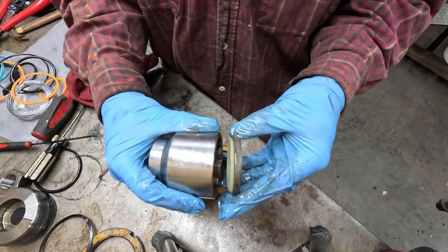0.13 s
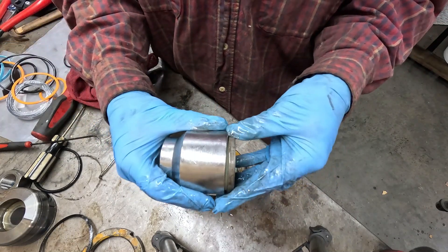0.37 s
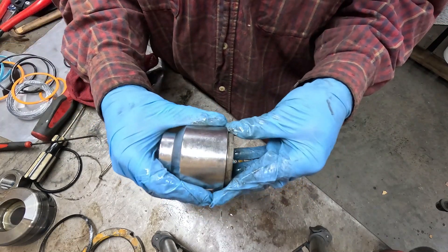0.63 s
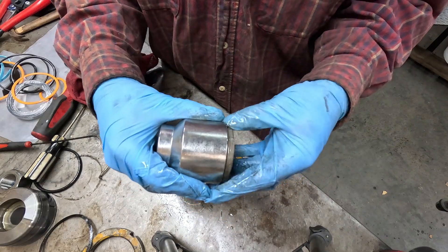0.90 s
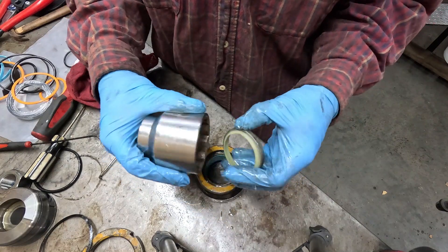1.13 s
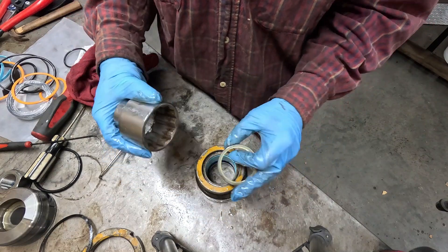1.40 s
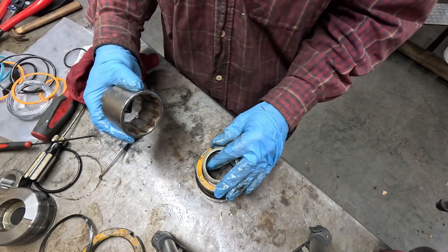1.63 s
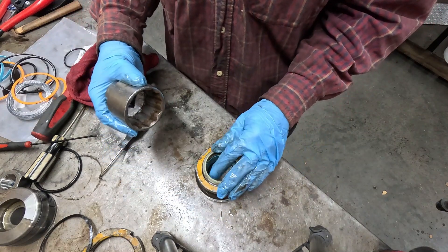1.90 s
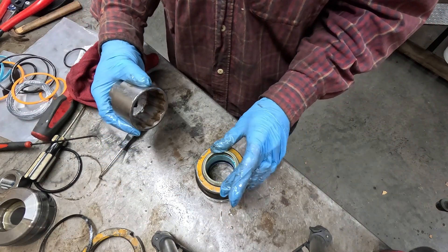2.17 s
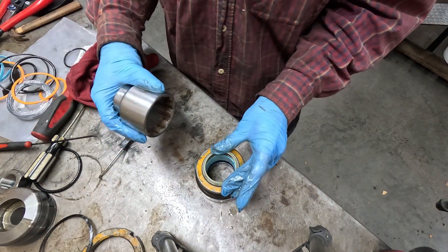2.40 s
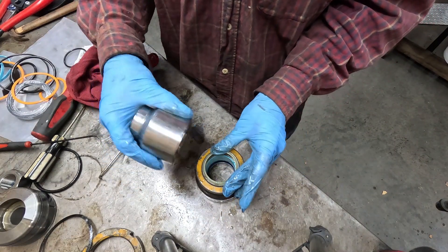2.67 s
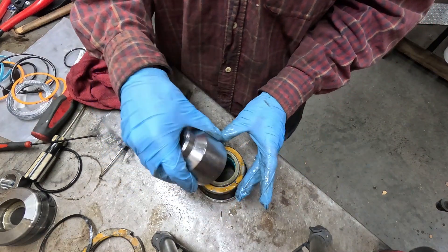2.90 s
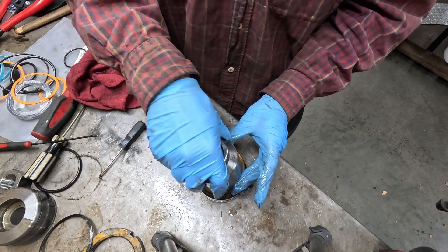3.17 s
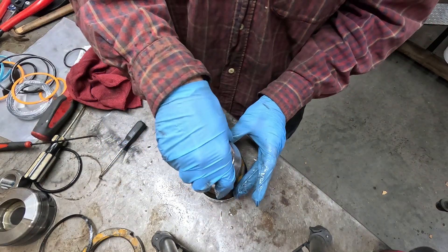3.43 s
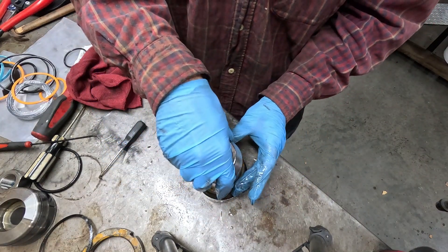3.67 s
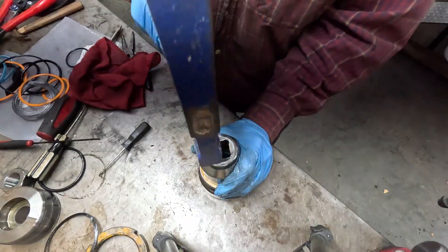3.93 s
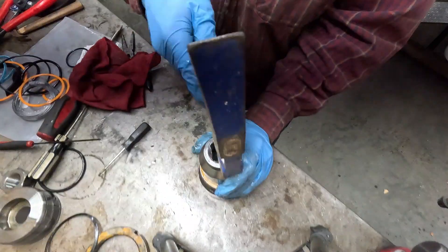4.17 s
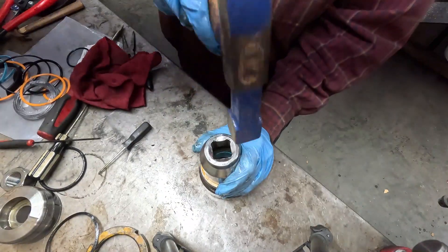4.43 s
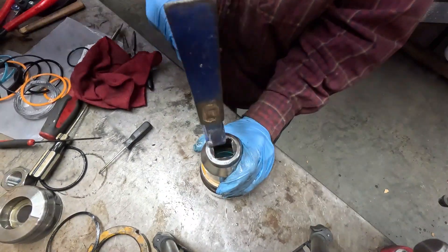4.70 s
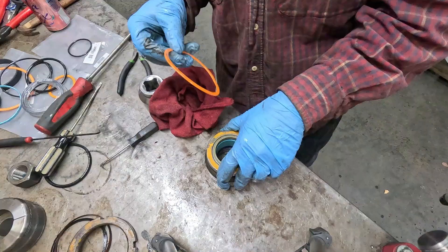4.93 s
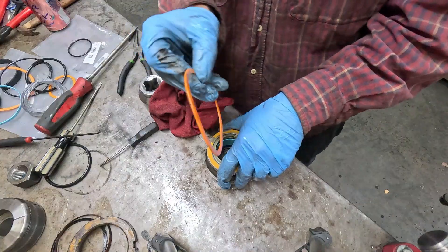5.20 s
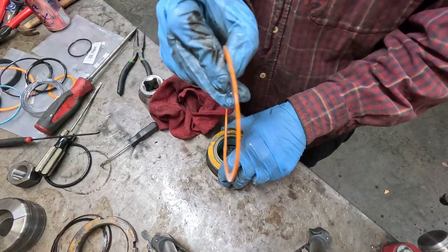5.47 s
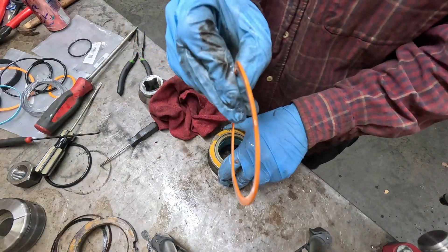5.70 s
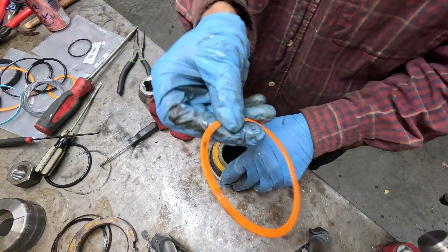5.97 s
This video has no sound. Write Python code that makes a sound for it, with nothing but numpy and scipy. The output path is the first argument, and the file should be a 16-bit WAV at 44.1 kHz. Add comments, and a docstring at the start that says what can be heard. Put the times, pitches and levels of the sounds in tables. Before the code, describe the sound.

In a reverberant workshop, heard close and wide, low rumble and light hiss lie under gloves rubbing and sleeves rustling. A scrape and a bright steel tick come near 0.5 s, with small scrapes and a tick around 0.9 to 1.0 s. From 1.55 to 2.1 s there is a busy cluster: a ringing clink at 1.6 s, scrapes, and dull low knocks as a seal is pressed home. Rubbing swells around 2.6 to 2.9 s, then fades, with a crisp tick at 3.53 s. At 3.77 s the sound becomes centred with a hard hammer blow on the socket, repeated at 4.2 and 4.68 s: short bright metallic ring, deep bench boom, diffuse hall tail. A tiny gap at 4.97 s cuts the tail. Then it is quiet: a faint tone near 5.1 s, a soft knock at 5.53 s, and a brief brushing scrape around 5.85 s before the end at about 6 s.

```python
"""At a workshop bench, gloved hands rub and touch a steel socket, a seal and its housing, spread wide over a low rumble.
Rubbing is flickering noise; ticks and scrapes are short noise puffs; taps and knocks set decaying sine tones ringing.
At 3.77 s a hammer drives the socket, twice more by 4.7 s: steel rings, bench booms, hall answers, all near the centre.
This part is quieter in the background and opens 5 ms into the first impact.
After a gap of some 20 ms at 4.97 s, the last part brings a brief faint tone, a knock and quiet handling."""
import sys
import numpy as np
from scipy import signal
from scipy.io import wavfile

SR = 44100
rng = np.random.default_rng(int(sys.argv[2]) if len(sys.argv) > 2 else 0)


def natural_amplitude(level_db):
    """Convert a level in decibels to a linear amplitude factor, elementwise."""
    exponent = np.asarray(level_db, float) / 20
    return 10 ** exponent


def int16_out(signal):
    """Quantize to a 16-bit WAV file."""
    q = np.round(np.clip(np.atleast_2d(signal).T, -1, 1) * 32767)
    wavfile.write(sys.argv[1], SR, q.astype(np.int16))


N = 268304   # length in samples, about 6.1 s
EDGES = 20 * 2 ** np.arange(0, 9.8, 1 / 3)   # third-octave band edges, Hz

# the tones of the struck steel: pitch_hz [Hz]
STEEL_HZ = [1120, 1700, 2440, 2870, 3040, 3160, 3330, 4620, 5470, 5680, 8650, 9950, 11620]
# how each tone dies and how loud each blow makes it, as each lands elsewhere on the rim:
# t60_s [s, time to fall 60 dB], blow1_db, blow2_db, blow3_db [dB]
STEEL_MODES = [(0.06, -21, -20.5, -21.5), (0.0073, -26.5, 0, -26.5), (0.013, -15, -16.5, -13.5),
               (0.069, -40.5, -15.5, -17.5), (.05, -44, -20, -12), (0.18, -76, -24, -15),
               (0.12, -39.5, -20.5, -11), (0.023, -34, -20.5, -18), (0.066, -22, -20.5, -18),
               (0.15, -26, -21.5, -22), (0.013, -32, -45.5, -50.5), (0.024, -27.5, -29.5, -43.5),
               (0.024, -17.5, -31.5, -48)]


def rms_one(x):
    """Scales a sound to unit power."""
    return x / np.sqrt(np.mean(x ** 2) + 1e-20)


def in_time(rows):
    """Joins (start_s, value) rows by straight lines."""
    return np.interp(np.arange(N) / SR, *np.transpose(rows))


def at_hz(points, hz):
    """Reads a spectrum between its points, on a log-frequency axis."""
    points_hz, values = np.transpose(points)
    return np.interp(np.log(hz), np.log(points_hz), values)


def drift(rate_hz):
    """A slow random curve of spread 1: noise smoothed at one twentieth of the sample rate."""
    r = np.exp(-40 * np.pi * rate_hz / SR)
    noise = rng.standard_normal(N // 20 + 2002)
    slow = signal.lfilter([1], [1, -2 * r, r * r], noise)[2000:]   # skip the filter's start
    return np.interp(np.arange(N) / 20, np.arange(len(slow)), rms_one(slow))


def band_pass(x, low_hz, high_hz):
    """Keeps the sound between two frequencies."""
    return signal.sosfilt(signal.butter(2, [low_hz, high_hz], "band", fs=SR, output="sos"), x)


def ring(x, hz, t60):
    """A resonance: a unit click sets a sine of height 1 ringing, 60 dB down after t60 seconds."""
    r, w = natural_amplitude(-60 / (t60 * SR)), 2 * np.pi * hz / SR
    return signal.lfilter([0, np.sin(w)], [1, -2 * r * np.cos(w), r * r], x + 1e-18)


def rough_tone(noise, hz, t60):
    """Noise through the same resonance twice: a blurred tone of unit power."""
    return rms_one(ring(ring(noise, hz, t60), hz, t60))


def narrow(hz, t60, level_db):
    """Noise through one resonance: a wavering tone."""
    return natural_amplitude(level_db) * rms_one(ring(rng.standard_normal(N), hz, t60))


def bands(white, low_hz, high_hz):
    """Yields centre and signal of third-octave bands; neighbours take unrelated noise."""
    for k, (low, high) in enumerate(zip(EDGES, EDGES[1:])):
        if low_hz <= low < high_hz:
            yield np.sqrt(low * high), band_pass(white[k % 2], low, high)


def band_power(gain, hz):
    """Power of white noise in a third-octave band (0.23 of its centre wide) after a gain."""
    return gain ** 2 * hz * .23 * 2 / SR


def bed(colour, low_hz, high_hz, level_db, tilt_db, patchy_db, grain_db):
    """Mid and side noise, flickering by band; grain makes the sample sizes uneven."""
    # how wide the noise is spread: pitch_hz [Hz], side_minus_mid_db [dB]
    width_points = [(60, -29.5), (180, -6), (550, -7.5), (1650, -5.5), (4970, -10.5), (15000, -9)]
    grain = natural_amplitude(grain_db * np.minimum(rng.exponential(1, (2, 1, N)), 5))
    white = rng.standard_normal((2, 2, N)) * grain
    out, power, together = 0, 0, drift(1.3)
    for hz, band in bands(white / np.std(white), low_hz, high_hz):
        gain = natural_amplitude(at_hz(colour, hz))
        power += band_power(gain, hz)
        flicker_db = patchy_db * (0.2 * together + drift(23.0))
        sway = natural_amplitude(flicker_db + tilt_db * np.log2(hz / 3500))
        out = out + gain * sway * band * [[1], [natural_amplitude(at_hz(width_points, hz))]]
    return out * natural_amplitude(level_db) / np.sqrt(power)


def room_rumble(level_db, last):
    """Low noise of the room; in the last part it is raised, but less deep."""
    # pitch_hz [Hz], density_db [dB per Hz]
    rumble_colour = [(12, -33), (20, 8), (54, 3.5), (107, 1.5), (132, -4.5), (167, -27), (240, -17),
                     (468, -24), (527, -19.5), (706, -61), (1200, -20.5), (1560, -66), (2640, -120)]
    return bed(rumble_colour, 20, 1000, level_db + 10.0 * last, 1.0 * last, patchy_db=-0.5, grain_db=-0.5)


def hum(rumble_db):
    """Steady low tones: noise through narrow resonances."""
    # pitch_hz [Hz], level_db [dB above the rumble level passed in], t60_s [s]
    hum_tones = [(59, -6, .5), (114, -10, .4), (178, -20, .4), (222, -20, .5), (268, -23, .4),
                 (525, -33, .15)]
    return sum(narrow(hz, t60, rumble_db + db) for hz, db, t60 in hum_tones)


def air(hushed_db, last):
    """Steady hiss, a grainy noise."""
    # pitch_hz [Hz], density_db [dB per Hz]
    air_colour = [(350, -34), (600, 4.5), (725, -1.5), (1400, 1), (4970, -16), (9750, -14), (15000, -43)]
    return bed(air_colour, 600, 16000, -71 + hushed_db - 0.96 * last, 0, patchy_db=2.3, grain_db=3.5)


def rustle(rustle_db, hushed_db, last):
    """Gloves and sleeves rubbing: flickering noise, brighter the harder they rub."""
    # pitch_hz [Hz], density_db [dB per Hz]
    rustle_colour = [(350, -45), (600, -6), (736, -23), (1020, -5.5), (1200, 3), (1430, 0), (1620, 0),
                     (2220, 1), (2640, -5.5), (2870, -0.5), (3380, -3), (4940, -1.5), (9500, -21),
                     (13900, -73), (15500, -46)]
    # dB per octave: 4 at the usual level of -63 dB, plus 0.03 for each dB above; 3 duller in the last part
    brightness_db = 4 + 0.03 * (rustle_db + 63) - 3.0 * last
    return bed(rustle_colour, 600, 16000, rustle_db + hushed_db, brightness_db, patchy_db=1.5, grain_db=0.5)


def rubbed_rings(rustle_db, last):
    """Faint wavering tones under the rubbing: noise through resonances."""
    # pitch_hz [Hz], level_db [dB above the rustle, before the wavering and the last part's cut], t60_s [s]
    rubbed_tones = [(3470, -5.5, 0.0084), (5220, -10.5, .008)]
    out = 0
    for hz, db, t60 in rubbed_tones:
        level_db = rustle_db + db - 9.0 * last * (hz > 4000)
        out = out + narrow(hz, t60, level_db) * natural_amplitude(3.1 * drift(4.2))
    return out


def lingering_tone(t, last):
    """A faint tone that opens the last part, loudest at 5.12 s."""
    return narrow(1720, .014, -67 - 30 * np.abs(t - 5.12)) * last


def puffs():
    """Ticks and scrapes: puffs of noise around a centre pitch that rise and die."""
    # hard ticks: start_s [s], level_db [dB, before the rise], pitch_hz [Hz], t60_s [s]
    ticks = [(0.4877, -38, 5700, 0.013), (1.007, -46, 4200, 0.071), (1.6049, -30.5, 3170, 0.034),
             (1.619, -34, 3260, 0.063), (1.9188, -40, 4000, 0.0071), (2.088, -45, 3400, 0.031),
             (2.1095, -47, 6000, .012), (2.4039, -48.5, 2070, 0.039), (2.852, -38.5, 4000, 0.015),
             (3.4111, -36, 3670, 0.011), (3.462, -46.5, 6800, 0.015), (3.5294, -23, 6040, 0.029),
             (4.801, -45, 9200, .02), (5.471, -49.5, 2020, 0.14), (5.49, -56, 8900, 0.083),
             (5.5488, -52, 7910, 0.015), (5.802, -59, 9100, 0.096)]
    # short scrapes, same columns
    scrapes = [(0.238, -39, 3000, 0.03), (0.475, -31.5, 2750, 0.084), (0.881, -36, 3620, 0.052),
               (1.57, -37.5, 6000, 0.14), (1.656, -33.5, 1530, 0.099), (1.701, -33, 4570, 0.051),
               (1.79, -44, 5460, 0.16), (1.961, -31, 1440, 0.073), (1.969, -28.5, 4800, 0.053),
               (1.19, -41.5, 5150, 0.25), (2.499, -45, 5800, 0.094), (2.601, -46.5, 5900, .08),
               (2.786, -43, 7700, 0.13), (2.887, -32, 3900, 0.044), (3.378, -42, 3970, 0.12),
               (3.450, -43.5, 550, 0.097), (3.50, -43, 554, .13), (5.835, -45, 8000, 0.21)]
    out, t = np.zeros(N), np.arange(9000) / SR
    rows = [(*row, 0.00081) for row in ticks]   # ticks rise in 0.81 ms
    rows += [(*row, 0.27 * row[-1]) for row in scrapes]   # scrapes rise for this share of their t60
    for start_s, level_db, hz, t60, rise_s in rows:
        puff = band_pass(rng.standard_normal(len(t)), hz / 2.06, min(hz * 1.58, 13000))
        shape = natural_amplitude(level_db - 60 * t / t60) * (1 - np.exp(-t / rise_s))
        at = round(start_s * SR)
        out[at:at + len(t)] += rms_one(puff) * shape
    return out


def struck(rows, modes):
    """Every row strikes all tones of a part, each with a random strength of its own."""
    at, out = [round(row[0] * SR) for row in rows], np.zeros(N)
    luck_db = rng.normal(0, 0.71, (len(rows), len(modes)))
    for k, (hz, level_db, t60) in enumerate(modes):
        clicks = np.zeros(N)
        clicks[at] = natural_amplitude(np.array(rows)[:, 1] + level_db + luck_db[:, k])
        out += ring(clicks, hz, t60)
    return out


def seal_knocks():
    """Fingers press the seal home: short low tones, softened, that start with a downward push."""
    # start_s [s], level_db [dB, before softening]
    knocks = [(1.855, -47), (1.9165, -37), (2.040, -37.5), (5.53, -50.5)]
    # pitch_hz [Hz], level_db [dB, before softening], t60_s [s]
    seal_tones = [(248, 6, 0.015), (485, 1.5, 0.023), (630, -48, 0.0077), (846, -9, 0.085)]
    return -signal.lfilter([.12], [1, -.88], struck(knocks, seal_tones))


def housing_taps():
    """Taps set the housing ringing."""
    # start_s [s], level_db [dB]
    tap_rows = [(1.6048, -19.5), (1.619, -30.5), (1.9719, -36.5)]
    # pitch_hz [Hz], level_db [dB], t60_s [s]
    housing_tones = [(1260, -23, 0.066), (1930, -28, 0.24), (3482, -1.5, 0.05), (6390, -0.5, 0.013)]
    return struck(tap_rows, housing_tones)


def socket_taps():
    """Light taps set the steel socket ringing."""
    # start_s [s], level_db [dB]
    tap_rows = [(.4898, -33.5), (.545, -58), (3.5294, -33)]
    # pitch_hz [Hz], level_db [dB], t60_s [s]
    socket_tones = [(4530, 0, .075), (6340, -8, .025), (10520, -16, .05), (13600, -27, .045)]
    return struck(tap_rows, socket_tones)


def touches():
    """All the handling sounds; puffs and housing lose their top treble."""
    dull = signal.butter(2, 11000, fs=SR, output="sos")
    return signal.sosfilt(dull, puffs() + housing_taps()) + socket_taps() + seal_knocks()


def hall(t, tilt_db):
    """Diffuse answer to a click, plain and coloured: noise that builds, slowest in the bass, and dies by band."""
    # pitch_hz [Hz], density_db [dB per Hz, before the tilt]
    hall_colour = [(18, -24.5), (30, -4.5), (85, 0.5), (168, -14.5), (256, -6), (369, -19.5), (467, -13.5),
                   (656, -18), (2620, -33), (3230, -36), (4090, -38), (5590, -51), (6540, -53.5),
                   (11900, -57.5), (15500, -76)]
    # pitch_hz [Hz], decay_s [s to fall 48 dB, before the ever faster extra fall]
    hall_decay = [(50, 0.82), (300, 0.37), (2000, 0.54), (6000, 0.54), (14000, 0.08)]
    # reflections arrive in clumps of 130 samples, about 3 ms
    lumps_db = np.repeat(rng.normal(0, 1.8, len(t) // 130 + 1), 130)[:len(t)]
    white = rng.standard_normal((2, len(t))) * natural_amplitude(lumps_db)
    plain, coloured, power = 0, 0, 0
    for hz, band in bands(white, 25, 16000):
        build = 1 - np.exp(-t / (0.0024 + 0.28 / hz))
        dying = band * natural_amplitude(-48 * t / at_hz(hall_decay, hz) - 70.0 * t ** 2) * build
        gain = natural_amplitude(at_hz(hall_colour, hz) + tilt_db * np.log2(max(hz, 800) / 800))
        power += band_power(gain, hz)
        plain, coloured = plain + dying, coloured + gain * dying
    return plain / np.sqrt(np.sum(plain ** 2)), coloured / np.sqrt(power)


def shimmer(t, k):
    """Loose steel on the bench shimmers on after blow k: rough tones, unevenly dying."""
    # pitch_hz [Hz], blow1_db, blow2_db, blow3_db [dB, before the unevenness and decay]
    shimmer_tones = [(3254, -48, -41, -35.5), (4590, -41.5, -43, -44), (5540, -37.5, -44.5, -49)]
    tones = sum(natural_amplitude(levels_db[k]) * rough_tone(rng.standard_normal(len(t)), hz, .010)
                for hz, *levels_db in shimmer_tones)
    uneven_db = 1.5 * drift(30.0)[:len(t)]
    return tones * natural_amplitude(uneven_db - 60 * t / 0.58) * (1 - np.exp(-t / .01))


def bench(t):
    """The top jolts down for a few ms, springs back and booms."""
    # pitch_hz [Hz], level_db [dB, before the blow's bench level], t60_s [s]
    bench_tones = [(53.6, -27.5, 0.2), (73.6, 1, 0.22), (121, -26, 0.1), (189.8, -22.5, 0.41),
                   (266.6, -6.5, 0.13), (305.5, -14, 0.23)]
    jolt = np.exp(-((t - .0037) / .0012) ** 2)
    push = np.exp(-((t - .0066) / .0008) ** 2)
    boom = sum(natural_amplitude(db) * ring(push / push.sum(), hz, t60) for hz, db, t60 in bench_tones)
    return boom - .9 * jolt


def steel_ring(t, k):
    """The steel rings after blow k: a round part rings in close pairs that beat."""
    click, out = (t == 0) * 1., 0
    for hz, (t60, *levels_db) in zip(STEEL_HZ, STEEL_MODES):
        damped = min(t60, .07)   # no tone of the pair rings longer than this, s
        pair = ring(click, hz * .994, damped) + ring(click, hz * 1.006, damped)
        out = out + natural_amplitude(levels_db[k]) * pair / 2
    return out


def crack(t, crack_db):
    """Steel hits steel: noise that dies within some 3 ms."""
    noise = rms_one(band_pass(rng.standard_normal(len(t)), 900, 5500))
    return noise * natural_amplitude(crack_db) * np.exp(-(t / .0022) ** 2)


def swell(before, k):
    """A rough ring and noise that rise just before blow k and stop 1 ms after impact."""
    hiss = rng.standard_normal((len(STEEL_HZ) + 1, len(before)))
    # 1.5 widens the level differences between the steel tones
    tones = sum(natural_amplitude(1.5 * mode[1 + k]) * rough_tone(noise, hz, .024)
                for hz, mode, noise in zip(STEEL_HZ, STEEL_MODES, hiss) if hz > 2000)
    out = rms_one(tones)
    out = out + natural_amplitude(-47) * rms_one(band_pass(hiss[-1], 6500, 12000))
    out = out + natural_amplitude(-9.5) * rms_one(band_pass(hiss[0], 900, 5500))
    # a steep climb, then a gentler one (dB per second)
    rise = natural_amplitude(np.minimum(1400 * (before + 0.0095), 150 * (before + 0.011)))
    opening = np.clip((before + .05) / 0.0098, 0, 1)
    closing = np.clip(1 - before / 0.00094, 0, 1)
    return out * rise * opening * closing


def hammer():
    """Each blow adds a crack, steel ring, bench boom, shimmer and hall answer; a rough swell rises just before
    it."""
    # start_s [s], crack_db, bench_db, hall_db [dB], hall_tilt_db [dB per octave above 800 Hz],
    # swell_db [dB, before its rise]
    blows = [(3.7655, 14, -10.5, -20, 4, -57.5), (4.1960, -12, -9.5, -19.5, 5, -20),
             (4.6840, -17.5, -8.5, -18.5, 3.5, -20)]
    out, lead = np.zeros(N + SR), 2600   # lead: samples before the impact
    t = np.arange(SR * 3 // 4) / SR
    before = np.arange(-lead, 100) / SR
    for k, (start_s, crack_db, bench_db, hall_db, tilt_db, swell_db) in enumerate(blows):
        at = round(start_s * SR)
        steel = steel_ring(t, k)
        direct = (steel + crack(t, crack_db)) * (1 - np.exp(-t / .0003))   # soft onset
        plain, coloured = hall(t, tilt_db)
        steel_echo = signal.fftconvolve(band_pass(steel, 2700, 6500), plain)[:len(t)]
        echo = natural_amplitude(-14.5) * steel_echo + natural_amplitude(hall_db) * coloured
        out[at:at + len(t)] += direct + natural_amplitude(bench_db) * bench(t) + echo + shimmer(t, k)
        out[at - lead:at + 100] += swell(before, k) * natural_amplitude(swell_db)
    return out[:N]


def scene():
    """Wide handling, then centred hammer blows, then a last centred part after a gap."""
    # room rumble: start_s [s], level_db [dB, before the shifts in the later parts]
    rumble_rows = [(0.0, -45.5), (1.91, -43.5), (2.1, -44.5), (3.38, -46), (3.6, -38.5), (3.7, -45.5),
                   (4.995, -51.5), (5.075, -65.5), (5.1, -56), (5.84, -54), (6.08, -57.5)]
    # rubbing: start_s [s], level_db [dB, before the tilt and the hammer part's cut]
    rustle_rows = [(0.0, -66), (0.32, -59), (0.47, -66.5), (0.95, -64.5), (1.22, -61.5), (1.55, -58),
                   (1.74, -57), (1.84, -72), (1.9, -76), (2.11, -59.5), (2.21, -71.5), (2.3, -66),
                   (2.58, -55.5), (2.77, -60.5), (2.85, -54), (3.22, -65), (3.37, -84), (3.5, -62),
                   (3.76, -65), (5.0, -76), (5.14, -65), (5.82, -66.5), (5.86, -50.5), (6.08, -68)]
    centred_s, gap_start_s, gap_end_s = 3.7705, 4.9675, 4.9906
    t = np.arange(N) / SR
    last = t > gap_start_s
    hushed_db = -10.0 * ((t > centred_s) & (t < gap_start_s))   # the hammer part's background is lower
    rumble_db, rustle_db = in_time(rumble_rows) + hushed_db, in_time(rustle_rows)
    mid, side = room_rumble(rumble_db, last) + rustle(rustle_db, hushed_db, last) + air(hushed_db, last)
    mid += hum(rumble_db)
    hits = touches() + rubbed_rings(rustle_db + hushed_db, last)
    mid = mid + hits + lingering_tone(t, last)
    side = side - .2 * hits   # in the wide part the hands sit a little to the right
    # the blows open over 3 ms and end with the gap
    mid += hammer() * np.clip((t - centred_s) / .003, 0, 1) * (t < gap_end_s)
    # once centred, mainly the top treble stays wide, 90 samples late
    high_pass = signal.butter(8, 11200, "high", fs=SR, output="sos")
    treble = signal.sosfilt(high_pass, np.roll(mid, 90))
    side = np.where(t < centred_s, side, natural_amplitude(-41.5) * side + natural_amplitude(-5) * treble)
    # the gap closes over 4 ms, stays 45 dB down and opens in 0.3 ms
    gap = np.maximum((gap_start_s - t) / .004, (t - gap_end_s) / .0003)
    return np.array([mid + side, mid - side]) * np.clip(gap, natural_amplitude(-45), 1)


def band_limit(x):
    """A steep low-pass at the top of the band."""
    return signal.sosfilt(signal.butter(12, 15770, fs=SR, output="sos"), x)


def record(dry):
    """Cuts the top above 14.9 kHz and finishes the mix."""
    cut = signal.butter(12, 14900, fs=SR, output="sos")
    mix = signal.sosfilt(cut, dry)
    return band_limit(mix)


dry = scene()
out = record(dry)
int16_out(out)
```